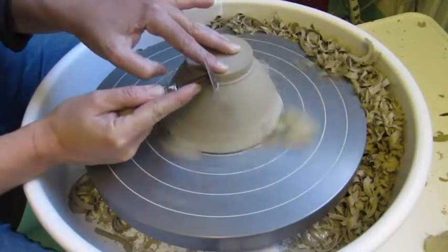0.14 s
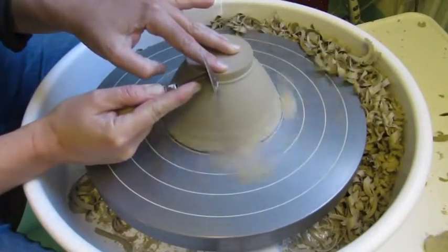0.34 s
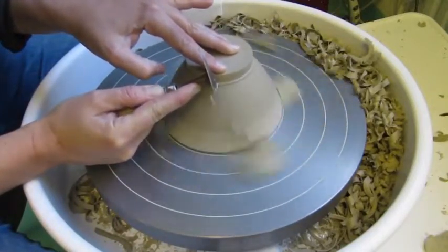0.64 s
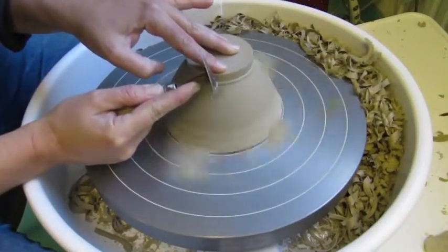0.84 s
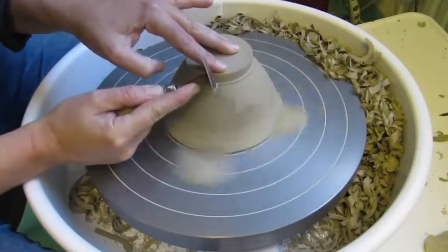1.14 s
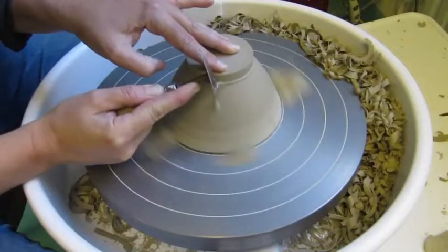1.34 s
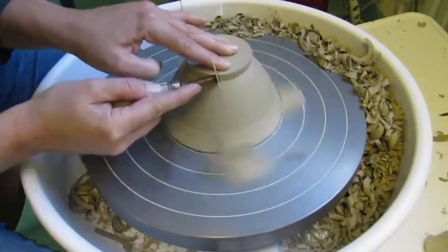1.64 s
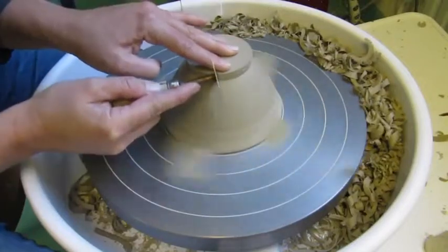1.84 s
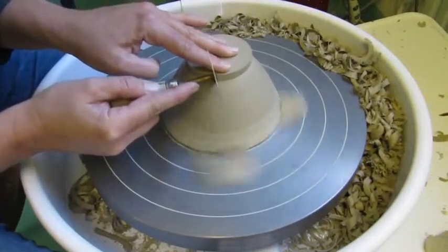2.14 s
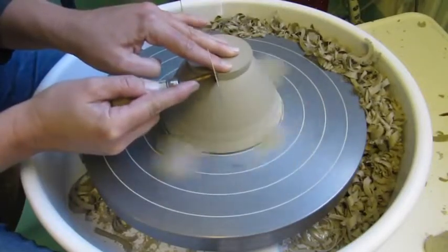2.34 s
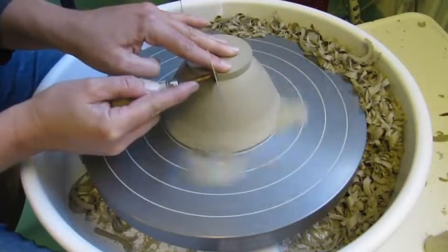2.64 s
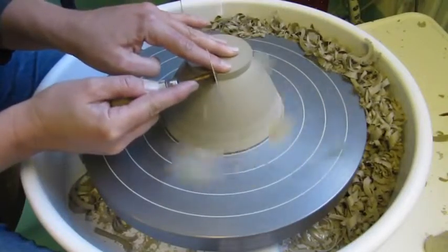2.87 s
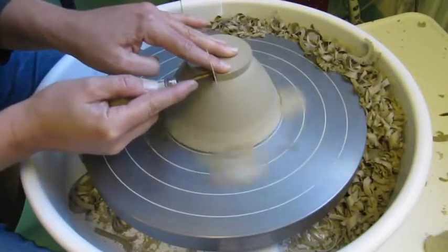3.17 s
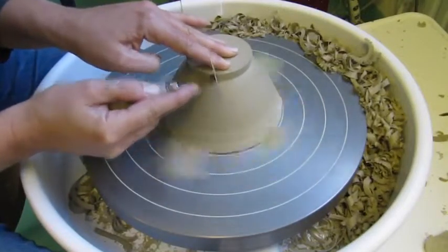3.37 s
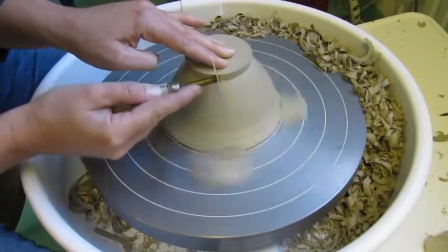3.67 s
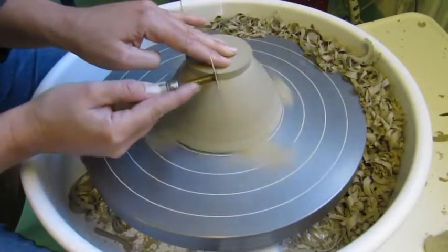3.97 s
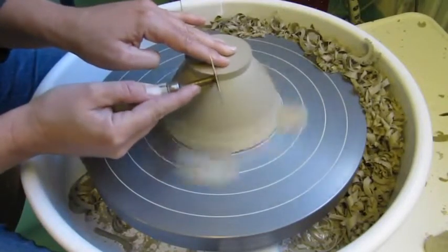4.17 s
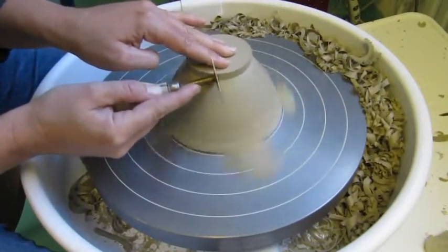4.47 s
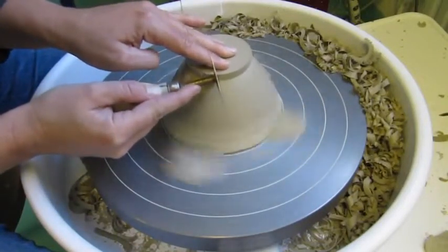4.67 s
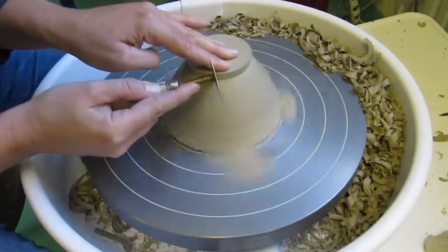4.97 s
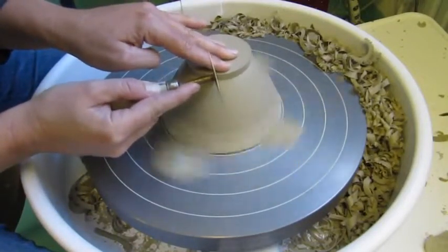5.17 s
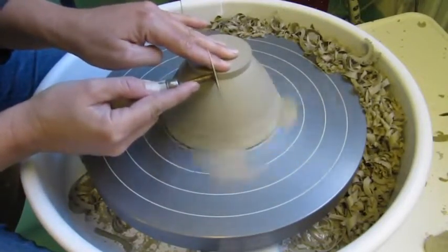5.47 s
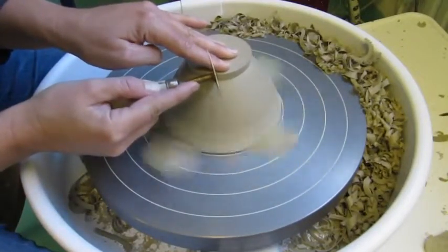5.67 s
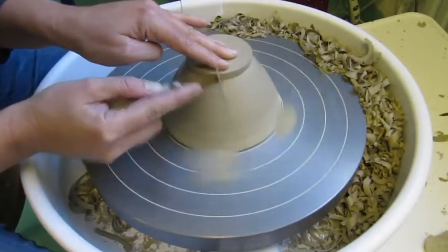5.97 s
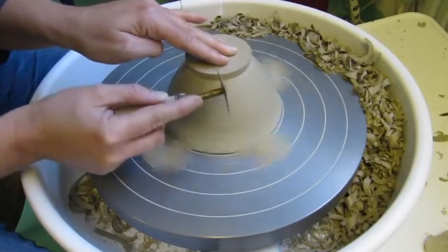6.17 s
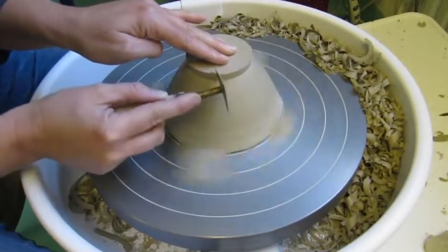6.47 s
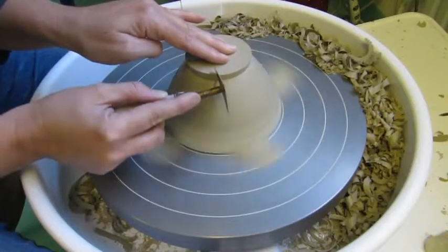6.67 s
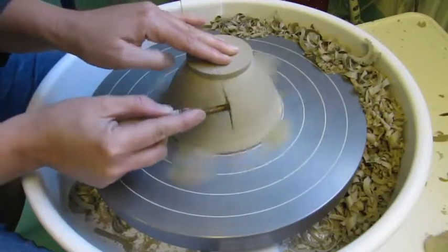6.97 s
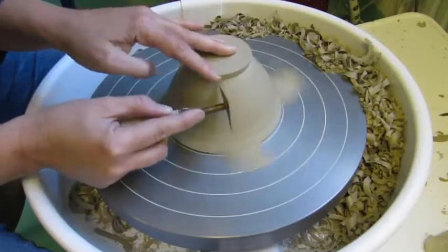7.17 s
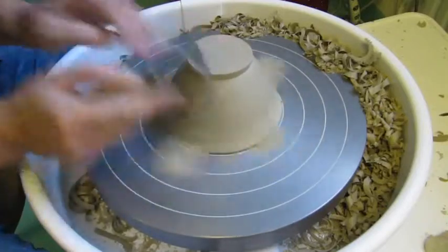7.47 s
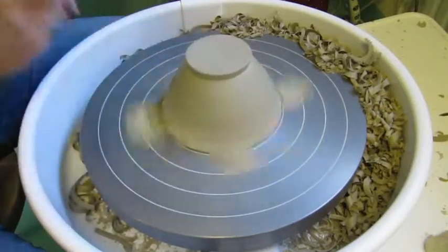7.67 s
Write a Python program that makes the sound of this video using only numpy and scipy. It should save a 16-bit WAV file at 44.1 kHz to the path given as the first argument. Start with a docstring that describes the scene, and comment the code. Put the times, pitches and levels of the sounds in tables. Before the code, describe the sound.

A metal tool scrapes gritty clay in long hissing, ringing strokes on a humming electric pottery wheel, with small clicks, then only the wheel whirrs.

```python
"""Trimming a clay bowl

A metal tool trims a leather-hard bowl on an electric pottery wheel, heard from close by in mono.
In four strokes the edge shaves gritty clay: random grains and noise hiss, ring blade and shank, drum the bowl.
Coarse grit catches with filtered clicks; there are light knocks and faint squeaks, swept by wavering sines.
Under it all the motor hums and whines in wavering tones, and hisses in filtered grains and noise."""
import sys
import numpy as np
from scipy import signal
from scipy.fft import rfft, irfft
from scipy.io import wavfile

SR = 44100
rng = np.random.default_rng(int(sys.argv[2]) if len(sys.argv) > 2 else 0)


def int16_out(signal):
    """Quantize to a 16-bit WAV file."""
    q = np.round(np.clip(np.atleast_2d(signal).T, -1, 1) * 32767)
    wavfile.write(sys.argv[1], SR, q.astype(np.int16))


N = 344862
TIME = np.arange(N) / SR
HZ = np.fft.rfftfreq(16384, 1 / SR)
CUTOFF_HZ = 15720

# strokes of the tool: start t/s, end t/s, attack t/s, release t/s, then before hand pressure
# bowl level/dB, shear level/dB, shank level/dB, blade level/dB; swing of the off-centre bowl's load level/dB
STROKES = [(0.0, 1.442, 0.004, 0.018, -43.5, -36, -42, -29, 0.8),
           (1.426, 3.417, 0.03, 0.061, -42, -37, -40, -29.5, 2),
           (3.765, 5.99, 0.025, 0.048, -43, -38.5, -42.5, -31, 2.5),
           (6.31, 6.89, 0.09, 0.045, -48, -44, -40.5, -49, 1.5)]
# blade modes and broad sizzle, which change with its angle on the clay, one list a stroke:
# f/Hz, width f/Hz, relative level/dB
BLADE_MODES = [
    [(2200, 250, -13), (6430, 230, -2.5), (7720, 200, 0), (7890, 140, .5), (8250, 350, -6),
     (9300, 1600, -12), (11200, 600, -16), (13400, 220, -18), (14300, 280, -18)],
    [(6410, 135, 0), (6730, 120, -17), (8000, 170, -11), (8760, 140, -13), (8900, 2000, -15),
     (13420, 190, -22.5), (14230, 210, -23)],
    [(6390, 145, 0), (6680, 140, -10), (7970, 170, -11), (8400, 280, -11), (8750, 220, -6.5),
     (8900, 2000, -13), (13420, 110, -16), (13880, 130, -23), (14210, 160, -23)],
    [(7850, 80, 0), (13420, 80, -4), (13850, 130, -12), (14200, 120, -9)],
]
# modes of the tool's shank, one list a stroke: f/Hz, width f/Hz, relative level/dB
SHANK_MODES = [
    [(4165, 130, -4.5), (4540, 91, 0)],
    [(4113, 156, 1), (4620, 100, 6.5), (5190, 340, -5)],
    [(4114, 130, 4.5), (4614, 127, 9), (5060, 550, -1.5)],
    [(4130, 81, 4.5), (4560, 200, -2.5)],
]
# modes of the bowl on the wheel head: f/Hz, width f/Hz, relative level/dB
BOWL_MODES = [(92, 18, -8), (208, 22, -2), (236, 30, -9), (273, 22, -5), (335, 50, -13), (388, 55, -7),
              (578, 30, -6), (626, 24, 0), (677, 28, 1), (725, 60, -5), (777, 38, 1), (1790, 80, -8)]
# colour of clay shearing at the edge: f/Hz, relative level/dB
SHEAR_COLOUR = [(60, -86), (500, -88), (850, -76), (1300, -76.5), (1660, -76.5), (1800, -68), (2600, -69.5),
                (3100, -73.5), (3480, -68.5), (3750, -72), (5100, -72.5), (5500, -77.5), (6050, -67.5),
                (7000, -73), (9400, -80), (11300, -125), (12500, -83), (15700, -89)]
# pressure of the hand on the tool: t/s, relative level/dB
PRESSURE = [(0, -1), (0.2, 0.5), (0.38, -1), (0.7, 1), (1.38, 0), (1.5, -0.7), (1.8, 0.15), (2.45, -0.5),
            (2.68, 1.4), (2.92, -1.4), (3.12, 1.1), (3.8, -5), (4.15, -0.5), (4.5, -1.5), (4.88, 1.5),
            (5.75, 1.5), (6.45, -1.5), (6.8, -0.2)]
# coarse grit catching the edge: t/s, crack level/dB, shank snap level/dB, blade ring level/dB, length t/s
CATCHES = [(0.194, -45, -48, -25, 0.006), (0.227, -43, -48, -22, 0.0051), (0.475, -39, -40, -27, 0.0042),
           (1.864, -43, -28, -21.5, 0.0058), (2.085, -31, -29, -40, 0.009), (2.295, -43, -31, -33, 0.005),
           (2.386, -35, -51, -25, 0.005), (2.599, -27.5, -19.5, -38, 0.0034),
           (3.109, -53, -30, -39, 0.0088), (3.144, -49, -44, -21.5, 0.01), (3.231, -33.5, -39, -26, 0.016),
           (3.803, -58, -56, -23.5, 0.0043), (3.883, -41, -56, -25, 0.0033),
           (3.9735, -28.5, -44, -20.5, 0.0032), (4.141, -37, -46, -24.5, 0.005),
           (4.39, -33, -47, -25, 0.0049), (5.165, -42, -23, -26.5, 0.009), (5.421, -38, -31, -34, 0.0046),
           (5.681, -29, -33, -26, 0.0075), (5.936, -36, -51, -26, 0.0033)]
# faint squeaks of tool and fingers on the clay: t/s, centre f/Hz, peak level/dB, length t/s
SQUEAKS = [(0.159, 2155, -36, 0.089), (5.996, 2720, -41, 0.044), (7.433, 2710, -36.5, 0.024),
           (7.635, 2690, -37.5, 0.061)]
# light knocks of crumbs and tool: t/s, hollow knock peak level/dB, tick relative level/dB
KNOCKS = [(0.0808, -32, -50), (4.9847, -30.5, -46), (7.221, -42, -26), (7.472, -42, -34)]
# colour of their tick: f/Hz, relative level/dB
TICK_COLOUR = [(300, -17), (1500, -4), (3500, 1), (5000, -3), (7000, 5), (9500, 13), (12000, -7),
               (15700, -22)]
# wavering tones of the motor: f/Hz, width f/Hz, level before effort/dB, throb rate f/Hz, throb depth level/dB
TONES = [(236, 14, -61.5, 1.72, 1), (273, 16, -55, 1.72, 2), (1420, 28, -55, 3.44, 2.5),
         (2372, 38, -54, 17.7, 3.5)]
# how hard the motor works, heard in its tones: t/s, gain level/dB
EFFORT = [(0, 0.5), (3.6, 2), (5.9, 2.5), (6.3, 0.5), (7.82, -1.5)]
# level of the running wheel's hiss: t/s, relative level/dB
RUNNING = [(0, -42.5), (0.8, -40), (1.5, -43), (4.1, -42.5), (5.8, -45), (6.2, -42.5), (7.27, -42.5),
           (7.52, -45.5), (7.82, -41.5)]
# colour of the brushes' and bearings' hiss: f/Hz, relative level/dB
HISS_COLOUR = [(1900, -100), (2600, -78), (3200, -90), (4200, -73), (4700, -79), (5500, -74), (6500, -71),
               (7050, -75), (7600, -70.5), (9100, -68.5), (10700, -73), (11300, -71.5), (12800, -84),
               (15700, -91.5)]
# resonances of the motor housing: f/Hz, width f/Hz, relative level/dB
HOUSING_MODES = [(2700, 230, -78), (3461, 160, -79), (4170, 200, -80), (4355, 80, -72), (4950, 200, -83),
                 (6270, 350, -76), (7400, 250, -80), (8310, 250, -75), (9550, 300, -75), (9900, 300, -73),
                 (10352, 90, -69)]
# colour of the dull drive and room noise: f/Hz, relative level/dB
RUMBLE_COLOUR = [(12, -88), (30, -80.5), (100, -82), (170, -83), (400, -87.5), (480, -88.5), (700, -82.5),
                 (950, -92.5), (1500, -93), (2100, -92), (4000, -105)]

# one turn of the wheel head, and when the high side of the bowl passes the edge
TURN_S, HIGH_SIDE_S = 0.257, 0.052
# every second turn bites harder, by this share of the swing
SECOND_TURN = 0.52
# dB that each part gains per dB of pressure
BOWL_FOLLOWS, SHEAR_FOLLOWS, SHANK_FOLLOWS, BLADE_FOLLOWS = 1.25, 1, 2.5, 0.4
# the drive of the blade flutters twice a turn, strongest at FLUTTER_S
FLUTTER_DB, FLUTTER_S = 0.47, 0.057
# swing of the running hiss with each turn
RUNNING_TURN_DB = 0.5


def scrape():
    """The edge chatters through gritty clay; pressure and turning drive bowl, shear, shank and blade."""
    chatter = wander(rate_hz=81)
    bowl = unit(ring(grains(per_s=3000, spread_db=2.0), peaks(BOWL_MODES, skirt=2.0)))
    grit = grains(per_s=5000, spread_db=3.5)
    friction = (grit + 0.82 * rng.standard_normal(N)) * amp(1.0 * chatter)
    shear = unit(ring(friction, slope(SHEAR_COLOUR)))
    drag = grains(per_s=4600, spread_db=-1.0)
    # the edge sticks and slips, so the blade rings in quick uneven spurts
    flutter_db = FLUTTER_DB * swing(TURN_S / 2, FLUTTER_S)
    slips = grains(per_s=9000, spread_db=4.0) * amp(0.18 * chatter + flutter_db)

    pressure = track(PRESSURE)
    off_centre = swing(TURN_S, HIGH_SIDE_S) + SECOND_TURN * swing(2 * TURN_S, HIGH_SIDE_S)
    out = np.zeros(N)
    for row, blade_modes, shank_modes in zip(STROKES, BLADE_MODES, SHANK_MODES):
        start, end, attack, release, bowl_db, shear_db, shank_db, blade_db, turn_db = row
        contact = np.clip(np.minimum((TIME - start) / attack, (end - TIME) / release), 0, 1)
        drum = amp(bowl_db + BOWL_FOLLOWS * pressure + turn_db * off_centre) * bowl
        hiss = amp(shear_db + SHEAR_FOLLOWS * pressure + 0.69 * wander(rate_hz=8)) * shear
        shank_ring = stir(drag, shank_modes, rate_hz=18, uneven_db=1.6)
        shank = amp(shank_db + SHANK_FOLLOWS * pressure) * shank_ring
        blade_ring = stir(slips, blade_modes, rate_hz=23, uneven_db=1.5)
        blade = amp(blade_db + BLADE_FOLLOWS * pressure) * blade_ring
        out += contact * (drum + hiss + shank + blade)
    return out


def catches():
    """A coarse grain cracks under the edge, snaps the shank, rings the blade and thumps the bowl."""
    out = np.zeros(N)
    dulled_shear = slope(SHEAR_COLOUR) / np.hypot(1, HZ / 6000)
    crack = np.hypot(dulled_shear, amp(-67) * peaks(BOWL_MODES))
    snap = peaks([(4630, 470, 0)], skirt=1.4)
    for s, crack_db, snap_db, blade_db, length in CATCHES:
        stroke = sum(s > row[0] for row in STROKES[1:])
        blade = peaks(BLADE_MODES[stroke])
        crunch = burst(length)
        for gain, db in [(crack, crack_db), (snap, snap_db), (blade, blade_db)]:
            sound = ring(crunch, gain)
            # the level is the rms if all the energy fell within the length
            add(out, s, amp(db) * sound * np.sqrt(length * SR) / np.linalg.norm(sound))
    return out


def knocks():
    """A dry tick of filtered noise with a short hollow sine ring from the plastic splash pan."""
    out = np.zeros(N)
    t = TIME[:len(HZ)]
    for s, knock_db, tick_db in KNOCKS:
        # the hollow ring falls 60 dB in 0.039 s
        add(out, s, amp(knock_db - 60 * t / 0.039) * np.sin(2 * np.pi * 1150 * t))
        add(out, s, amp(tick_db) * ring(burst(length=0.0033), slope(TICK_COLOUR)))
    return out


def squeaks():
    """Brief, rough, narrow chirps: sines whose pitch jitters quickly."""
    out = np.zeros(N)
    for s, hz, db, length in SQUEAKS:
        window = signal.windows.hann(round(length * SR))
        pitch = hz * (1 + 0.038 * wander(rate_hz=420)[:len(window)])
        add(out, s, amp(db) * window * np.sin(2 * np.pi * np.cumsum(pitch) / SR))
    return out


def wheel():
    """The motor's tones follow its effort; its hiss flutters in the housing and swells each turn."""
    return motor_tones() + running_hiss() + rumble()


def motor_tones():
    """Each tone is a wavering sine plus narrow noise, throbbing together."""
    tones = 0
    for hz, width, db, per_s, depth_db in TONES:
        pitch = hz + 0.22 * width * wander(rate_hz=15.5)
        tone = np.cos(2 * np.pi * np.cumsum(pitch) / SR)
        fuzz = unit(ring(rng.standard_normal(N), peaks([(hz, width, 0)], skirt=2.66)))
        tones = tones + amp(db) * unit((0.76 * tone + fuzz) * throb(per_s, depth_db))
    return amp(track(EFFORT)) * tones


def running_hiss():
    """Brushes and bearings crackle in dense, fluttering grains, and noise whirrs in the housing."""
    flutter = throb(per_s=23.3, depth_db=0.8) * amp(1.1 * wander(rate_hz=31))
    brushes = grains(per_s=14000, spread_db=1.5) * flutter
    hiss = amp(4) * unit(ring(brushes, slope(HISS_COLOUR)))
    whirr = amp(0.5) * stir(rng.standard_normal(N), HOUSING_MODES, rate_hz=18, uneven_db=4.0)
    level_db = track(RUNNING) + RUNNING_TURN_DB * swing(TURN_S, HIGH_SIDE_S)
    return amp(level_db) * (hiss + whirr)


def rumble():
    """Steady dull noise of the drive and the room."""
    return amp(-51.0) * unit(ring(rng.standard_normal(N), slope(RUMBLE_COLOUR)))


def stir(drive, modes, rate_hz, uneven_db):
    """Drives a set of resonances, each one swelling and sinking on its own."""
    total = 0
    for hz, width, db in modes:
        level = amp(db + uneven_db * wander(rate_hz)) * np.sqrt(width)
        total = total + level * ring(drive, peaks([(hz, width, 0)]))
    return unit(total)


def grains(per_s, spread_db):
    """Tiny fractures at random moments, of either sign and uneven size."""
    size = amp(spread_db * np.minimum(rng.exponential(1, N), 4))
    return unit(size * rng.choice([-1., 1.], N) * (rng.random(N) < per_s / SR))


def burst(length, count=4096):
    """A short crunch of noise that starts at once and dies away, to 1/e after its length."""
    t = np.arange(count) / SR
    return rng.choice([-1., 1.], count) * np.exp(-(t / length) ** 2)


def ring(x, gain):
    """Passes x through a causal minimum-phase filter of this shape that keeps white noise's power."""
    log_gain = np.log(np.maximum(unit(gain), 1e-5))
    circle = np.concatenate([log_gain, log_gain[-2:0:-1]])
    response = irfft(np.exp(np.conj(signal.hilbert(circle)))[:len(HZ)])
    return signal.oaconvolve(x, response[:len(HZ) // 2])[:len(x)]


def peaks(modes, skirt=2.86):
    """Gain of a set of resonances, their powers added; a higher skirt falls off faster."""
    power = 0
    for hz, width, db in modes:
        offset = (HZ - hz) / (width / 2)
        power = power + amp(db) ** 2 / (1 + offset ** 2 / skirt) ** skirt
    return np.sqrt(power)


def slope(points):
    """Gain of a smooth spectrum drawn through points on a log frequency axis."""
    hz, db = np.transpose(points)
    return amp(np.interp(np.log(HZ + 1), np.log(hz), db))


def wander(rate_hz, count=8192):
    """Slow chance of rms 1, up to about this rate."""
    hz = np.fft.rfftfreq(count, N / SR / count)
    tilt = hz / (hz + 2) / (1 + (hz / rate_hz) ** 2)
    slow = irfft(rfft(rng.standard_normal(count)) * tilt)
    return np.interp(TIME, np.linspace(0, N / SR, count), unit(slow))


def throb(per_s, depth_db):
    """A gain that swings regularly, up and down by this depth."""
    return amp(depth_db * np.sin(2 * np.pi * per_s * TIME))


def swing(period_s, top_s):
    """A cosine of this period with a crest at top_s."""
    return np.cos(2 * np.pi * (TIME - top_s) / period_s)


def track(points):
    """Draws straight lines through timed values."""
    return np.interp(TIME, *np.transpose(points))


def amp(db):
    """Decibels to gain."""
    return 10 ** (np.asarray(db) / 20)


def unit(x):
    """Scales to rms 1."""
    return x / np.sqrt(np.mean(x ** 2) + 1e-20)


def add(mix, s, sound):
    """Mixes a sound in at a time in seconds."""
    part = mix[max(round(s * SR), 0):][:len(sound)]
    part += sound[:len(part)]


def scene():
    """Everything reaches one microphone, the same in both channels."""
    mono = scrape() + catches() + knocks() + squeaks() + wheel()
    return np.array([mono, mono])


def record(dry):
    """The recorder's band limit, a steep low-pass."""
    low_pass = signal.firwin(701, CUTOFF_HZ, window=("kaiser", 9), fs=SR)
    return signal.oaconvolve(dry, low_pass[None], "same")


dry = scene()
out = record(dry)
int16_out(out)
```